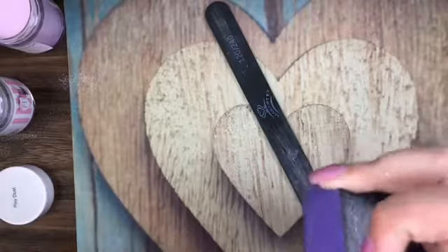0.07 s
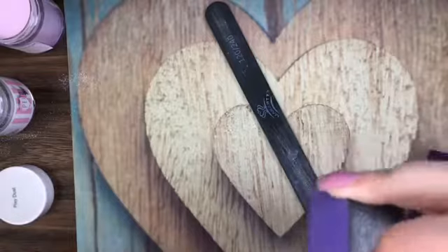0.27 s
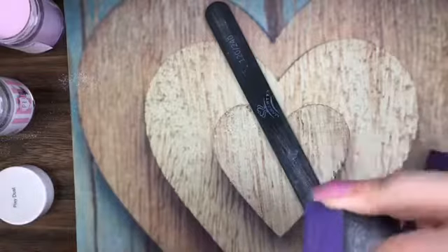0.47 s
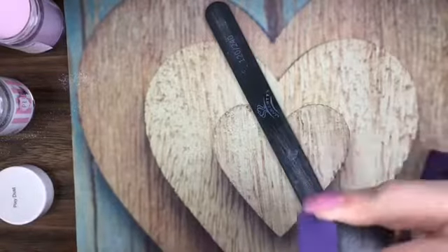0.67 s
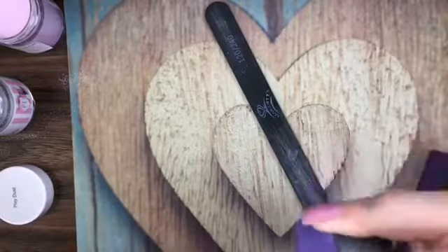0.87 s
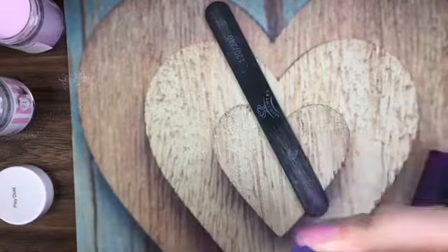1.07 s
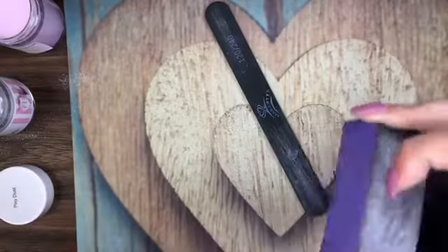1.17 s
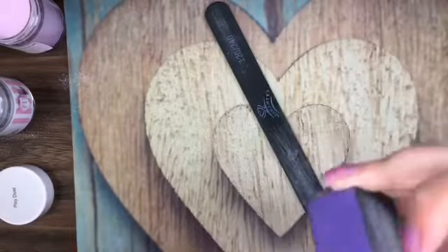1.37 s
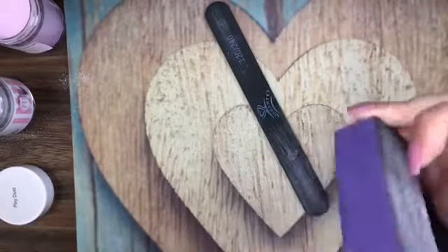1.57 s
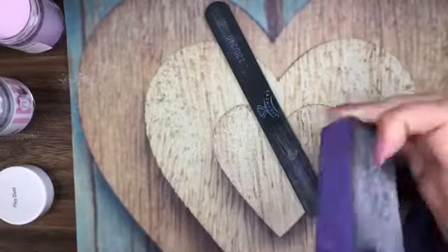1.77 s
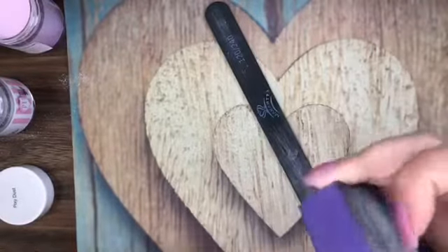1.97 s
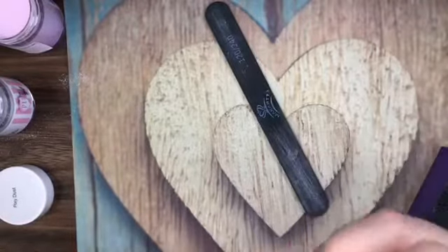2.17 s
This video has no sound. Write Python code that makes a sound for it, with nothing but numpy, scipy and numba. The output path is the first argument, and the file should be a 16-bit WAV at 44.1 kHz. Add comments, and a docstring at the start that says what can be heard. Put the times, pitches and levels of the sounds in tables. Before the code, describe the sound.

A gritty buffer block scrubs a fingernail from the start, about five back-and-forth cycles a second, each stroke a short dry scratch with a falling rasp. Near 1.05 s the last push digs in and snaps off the edge, the loudest moment. After a pause, soft knocks and ticks with short wipes come at 1.35 and 1.6 s, then a fainter wipe at 1.7 s. Quiet small room, close, centred, low hum.

```python
"""Foam buffer block on a fingernail

A block scrubs a nail about five times back and forth a second, then is set down with soft ticks for single wipes.
Dense grain impacts, coloured by nail and block, make the scratch; a resonance of falling pitch makes the rasp.
The last push digs in and flicks off the edge. Touch-downs are ringing ticks plus down-chirping knocks.
Close reflections, a small room's tail, dull air noise and a low hum surround it; both channels are equal."""
import sys
import numpy as np
from scipy import signal
from scipy.fft import rfft, irfft
from scipy.io import wavfile
from scipy.ndimage import uniform_filter1d, map_coordinates
from numba import njit

SR = 44100
rng = np.random.default_rng(int(sys.argv[2]) if len(sys.argv) > 2 else 0)


def put_to_file(sound):
    """Save the sound as 16-bit audio at rate SR, in the file named by the first command-line argument."""
    columns = np.atleast_2d(sound).T  # one column per channel
    safe = np.clip(columns, -1, 1)
    whole_steps = np.round(safe * 32767)
    wavfile.write(sys.argv[1], SR, whole_steps.astype(np.int16))


N = 97946

# forward strokes: start t/s, length/s, level/dB, attack/s, swell over the stroke/dB,
# rasp re scratch/dB, final rasp f/Hz
PUSH_STROKES = [(-.03, 0.053, -32.5, .008, -4, -5.5, 1880), (.166, 0.054, -37.5, 0.005, 0.5, -6.5, 1935),
                (0.352, 0.061, -36.5, .005, 2.5, -2.5, 2060), (0.5436, .057, -34, 0.0024, 0, -1.5, 1940),
                (0.729, 0.059, -34, 0.015, 0.5, -2.5, 2350), (0.907, 0.056, -36, 0.01, 3.5, -5, 2150),
                (1.005, 0.068, -38, 0.0041, 8, -17.5, 3000)]
# return strokes: same columns
PULL_STROKES = [(0.068, 0.069, -35.5, .016, -4, -1, 3200), (0.253, 0.085, -35.5, 0.016, -4.5, -4, 3500),
                (0.446, .068, -35.5, 0.0045, 3, -6.5, 3280), (0.631, 0.084, -34, .018, -4, -30, 3400),
                (0.822, 0.064, -36, .012, -1, 1, 3340)]
# scratch spectrum of pulls and grazes: f/Hz, level/dB
PULL_SPECTRUM = [(120, -51), (200, -18), (569, -9), (683, -15.5), (968, -10.5), (1350, -12.5), (1840, -16),
                 (2090, -3.5), (2750, -9.5), (3430, -0.5), (3830, -6.5), (7140, -6), (16000, -13.5)]
# resonances of nail and block: f/Hz, width/Hz, lift/dB
NAIL_RESONANCES = [(887, 52, 11.5), (2085, 53, 8.5), (2983, 33, 4), (3427, 130, 4), (5050, 900, 6)]

GRAINS_PER_S, GRAIN_SPREAD_DB = 17000, 2.5
LEVEL_WANDER_HZ, LEVEL_WANDER_DB = 170, 0.02  # too slight to hear
PULL_RELEASE_S = 0.0069


def undb(db):
    """Decibels to gain."""
    return 10 ** (np.asarray(db) / 20)


def unit(x):
    """Scale to an rms of 1."""
    return x / np.sqrt(np.mean(x ** 2))


def walk(rate_hz):
    """Smooth random wander with an rms of 1: noise averaged twice over 1/rate."""
    k = max(int(SR / rate_hz), 1)
    once = uniform_filter1d(rng.standard_normal(N), k)
    return unit(uniform_filter1d(once, k))


def colour(x, points, peaks=()):
    """Minimum-phase filter through (Hz, dB) points, with resonances on top."""
    size = 2 * N
    f = np.maximum(np.fft.rfftfreq(size, 1 / SR), 1)
    hz, db = np.array(points, float).T
    curve_db = np.interp(np.log(f), np.log(hz), db)
    for centre_hz, width_hz, lift_db in peaks:
        curve_db = curve_db + lift_db / (1 + (2 * (f - centre_hz) / width_hz) ** 2)
    # folding the cepstrum makes the response causal
    cepstrum = irfft(np.log(undb(curve_db)))
    cepstrum[1:N] *= 2
    cepstrum[N + 1:] = 0
    response = np.exp(rfft(cepstrum))
    return irfft(rfft(x, size) * response)[:N]


@njit
def resonate(x, hz, k):
    """State-variable band-pass with a moving centre and relative width k."""
    y, band, low = np.empty(len(x)), 0., 0.
    for i in range(len(x)):
        g = np.tan(np.pi * hz[i] / SR)
        v = (band + g * (x[i] - low)) / (1 + g * (g + k))
        band = 2 * v - band
        low = low + 2 * g * v
        y[i] = k * v
    return y


def grit():
    """Dense tiny impacts of abrasive grains, of random size and sign, in an even hiss."""
    hit = rng.random(N) < GRAINS_PER_S / SR
    size = undb(GRAIN_SPREAD_DB * np.minimum(rng.exponential(size=N), 5))
    sign = rng.choice([-1, 1], N)
    wander = undb(LEVEL_WANDER_DB * walk(LEVEL_WANDER_HZ))
    return unit(hit * size * sign * wander)


def resonant_grit(hz, width):
    """Grit through two equal band-passes of moving centre and relative width."""
    once = resonate(grit(), hz, float(width))
    return resonate(once, hz, float(width))


def scuff(hz, width):
    """Grit heard through one broad fixed resonance."""
    return unit(resonant_grit(np.full(N, float(hz)), width))


def contact(t, start, length, attack, release):
    """Pressure rises, holds and dies away."""
    rise = np.sin(np.pi / 2 * np.clip((t - start) / attack, 0, 1))
    return rise * np.exp(-np.maximum(t - start - length, 0) / release)


def background(t):
    """Dull room air and a wavering low hum."""
    # air spectrum: f/Hz, level/dB
    air_spectrum = [(15, -67), (25, -26), (49, -13.5), (92, -15.5), (123, -6), (229, -11.5), (263, -11.5),
                    (531, -24), (1130, -26), (1290, -30), (16000, -48.5)]
    # hum partials: f/Hz, level/dB
    hum_partials = [(58.6, -68), (122, -70)]
    air_db, waver_db = -62, 3
    hum = np.zeros(N)
    for hz, db in hum_partials:
        level = undb(db + waver_db * walk(6))
        hum += level * np.sqrt(2) * np.sin(2 * np.pi * (hz * t + rng.random()))
    return hum + undb(air_db) * unit(colour(rng.standard_normal(N), air_spectrum))


def nudges(t):
    """Soft low thuds of the table under the hand: decaying sines."""
    # hand nudging the table: t/s, level/dB
    thuds = [(1.058, -46.5), (1.084, -49.5), (1.345, -49), (1.646, -45)]
    thud_hz, decay_s = 72, 0.011
    out = np.zeros(N)
    for start, db in thuds:
        age = np.maximum(t - start, 0)
        out += undb(db) * np.exp(-age / decay_s) * np.sin(2 * np.pi * thud_hz * age)
    return out


def touches(t):
    """A bright tick, then a knock that spreads as a bending wave and so chirps downward."""
    # block touching down: t/s, knock peak/dB, knock brightness f/Hz, tick peak/dB
    touchdowns = [(1.3374, -32.5, 800, -45), (1.5665, -35, 1600, -32), (2.2042, -45.5, 445, -39.5)]
    # modes of the grit tick: f/Hz, t60/s, relative level/dB
    tick_modes = [(2970, 0.006, -8), (4010, 0.0066, 1.5), (5500, 0.0079, 0), (8400, 0.0034, -5)]
    bend_s, bend_ref_hz, low_hz = 0.00244, 1015, 400  # bend_s: travel time at bend_ref_hz
    f = np.fft.rfftfreq(N, 1 / SR)
    out = np.zeros(N)
    for start, knock_db, bright_hz, tick_db in touchdowns:
        low_cut = f ** 2 / (f ** 2 + low_hz ** 2)
        shape = low_cut / np.sqrt(1 + (f / bright_hz) ** 4) / np.sqrt(f + low_hz)
        # bending waves: delay falls as 1 / sqrt(f)
        cycles = f * start + 2 * bend_s * np.sqrt(f * bend_ref_hz)
        knock = irfft(shape * np.exp(-2j * np.pi * cycles), N)
        age = np.maximum(t - start, 0)
        tick = np.zeros(N)
        for hz, t60_s, mode_db in tick_modes:
            tick += undb(mode_db - 60 * age / t60_s) * np.sin(2 * np.pi * hz * age)
        out += undb(knock_db) * knock / np.abs(knock).max()
        out += undb(tick_db) * tick / np.abs(tick).max()
    return out


def grazes(t):
    """Faint scratching while the block barely touches."""
    # graze envelope: t/s, level/dB
    graze_levels = [(0, -65), (.07, -53), (.155, -71), (.25, -56), (.345, -55), (.535, -63.5), (.725, -53),
                    (.82, -58), (.9, -62), (1.002, -73), (1.082, -100), (1.334, -100), (1.339, -54),
                    (1.358, -55), (1.43, -68), (1.5, -78), (1.565, -100), (1.576, -51), (1.65, -53),
                    (1.675, -61), (1.76, -73.5), (1.93, -71), (2.05, -84), (2.22, -95)]
    when, db = np.array(graze_levels).T
    return undb(np.interp(t, when, db)) * unit(colour(grit(), PULL_SPECTRUM, NAIL_RESONANCES))


def fingertip(t):
    """The fingertip's dull scuff, strongest in mid-pull."""
    scuff_hz, relative_width, scuff_db = 1370, 0.37, -17  # dB re the pull
    gain = np.zeros(N)
    for start, length, db, *_ in PULL_STROKES:
        along = np.clip((t - start) / (length + PULL_RELEASE_S), 0, 1)
        gain += undb(db + scuff_db) * np.sin(np.pi * along)
    return gain * scuff(scuff_hz, relative_width)


def bites(t):
    """A short, low scuff as the finger gives when each push takes hold."""
    bite_hz, relative_width, release_s, bite_db = 926, 0.69, 0.003, -14  # dB re the push
    gain = np.zeros(N)
    for start, _, db, attack, *_ in PUSH_STROKES:
        gain += undb(db + bite_db) * contact(t, start, attack, attack, release_s)
    return gain * scuff(bite_hz, relative_width)


def strokes(t, rows, spectrum, release_s, top_hz):
    """Each stroke scratches broadly and rasps at a pitch that sinks as the block slows."""
    rasp_width, slowing = 0.24, 3.3  # relative bandwidth; exponent of the pitch fall
    rasp_middle = 0.23  # rasp gain in mid-stroke; the ends add 1
    rasp_settles = .9  # share of the stroke at which the pitch is lowest
    scratch_gain, rasp_gain = np.zeros(N), np.zeros(N)
    pitch = np.full(N, float(top_hz))
    for start, length, db, attack, swell_db, rasp_db, end_hz, arch_db in rows:
        along = np.clip((t - start) / length, 0, 1)
        ends = (2 * along - 1) ** 2
        pressure = contact(t, start, length, attack, release_s)
        gain = pressure * undb(db + swell_db * along - arch_db * ends)
        scratch_gain += gain
        rasp_gain += gain * undb(rasp_db) * (rasp_middle + ends) * pressure
        fall = np.minimum(along / rasp_settles, 1) ** slowing
        pitch = np.where(t >= start, top_hz + (end_hz - top_hz) * fall, pitch)
    scratch = unit(colour(grit(), spectrum, NAIL_RESONANCES))
    # bandwidth grows with pitch: even out the level
    rasp = unit(resonant_grit(pitch, rasp_width) / np.sqrt(pitch))
    return scratch_gain * scratch + rasp_gain * rasp


def wipes(t):
    """Single wipes after the block is set down."""
    # wipes: the pulls' columns, then mid-stroke arch over the ends/dB
    wipe_strokes = [(1.356, 0.067, -34.5, .011, -5.5, -10, 2600, 3),
                    (1.593, 0.043, -34.5, 0.0032, 0, -5, 2770, -2.5),
                    (1.689, 0.05, -45, .005, -8.5, -8.5, 2930, 3.5)]
    # scratch spectrum: f/Hz, level/dB
    wipe_spectrum = [(120, -38), (200, -9), (1320, -7.5), (1770, -8.5), (2020, -2.5), (2290, -13),
                     (2560, 4.5), (2800, -10.5), (3250, 1), (4520, -4), (7140, -6.5), (8580, -5.5),
                     (15100, -10), (16000, -22)]
    return strokes(t, wipe_strokes, wipe_spectrum, release_s=0.0052, top_hz=3980)


def flick(t):
    """The last push digs in, catches on the nail's edge and slips off: scrape plus filtered clicks."""
    # scrape envelope: t/s, level/dB
    scrape_levels = [(1.021, -51), (1.042, -32.5), (1.06, -26.5), (1.067, -22.5), (1.073, -27),
                     (1.079, -36), (1.087, -40.5), (1.099, -56.5)]
    # grit catching on the edge: t/s, click level/dB
    edge_snaps = [(1.0655, -17), (1.0705, -26.5), (1.0749, -11)]
    # flick spectrum: f/Hz, level/dB
    flick_spectrum = [(120, -20), (260, -12), (450, -13.5), (680, -19), (920, -9.5), (1300, -4.5),
                      (1800, -10.5), (2870, -2), (3900, -6), (4780, -3), (7350, -6.5), (10000, -16),
                      (16000, -23.5)]
    when, db = np.array(scrape_levels).T
    gain = undb(np.interp(t, when, db)) * (t > when[0]) * (t < when[-1])
    scrape = gain * unit(colour(grit(), flick_spectrum, NAIL_RESONANCES))
    catches = np.zeros(N)
    for start, peak_db in edge_snaps:
        catches[int(start * SR)] = undb(peak_db)
    snaps = colour(catches, flick_spectrum, NAIL_RESONANCES)
    return scrape + snaps * catches.max() / np.abs(snaps).max()


def pulls(t):
    """Return strokes, arched towards mid-stroke."""
    arch_db = 8  # mid-stroke over the ends
    rows = [(*row, arch_db) for row in PULL_STROKES]
    return strokes(t, rows, PULL_SPECTRUM, PULL_RELEASE_S, top_hz=4640)


def pushes(t):
    """Forward strokes with a nearly flat arch."""
    # scratch spectrum: f/Hz, level/dB
    push_spectrum = [(120, -39.5), (200, -16), (933, -11), (1320, -24.5), (2020, -1.5), (2700, -11),
                     (3020, -1), (3250, 0), (4680, -5.5), (5230, -5.5), (12400, -8), (14300, -10.5),
                     (16000, -17.5)]
    arch_db = 0.5  # mid-stroke over the ends
    rows = [(*row, arch_db) for row in PUSH_STROKES]
    return strokes(t, rows, push_spectrum, release_s=0.009, top_hz=4510)


def patchy(x, count=26):
    """The contact patch shifts: overlapping bands wander in level, each on its own."""
    patch_db, patch_hz = 2.0, 42
    f = np.maximum(np.fft.rfftfreq(N, 1 / SR), 1)
    place = np.interp(np.log(f), np.log([600, 16000]), [0, count - 1])
    spectrum = rfft(x)
    out = np.zeros(N)
    for k in range(count):
        band = irfft(spectrum * np.maximum(1 - np.abs(place - k), 0), N)
        out += band * undb(patch_db * walk(patch_hz))
    return out


def bounces(x, t):
    """Close reflections comb the scratching; the pattern shifts as the hand moves."""
    # reflections from fingers, block and table: delay/s, level/dB
    reflections = [(.0007, -11), (.0017, -22.5), (.0029, -17.5), (.0046, -25)]
    sway_s, sway_hz = .00004, 3.5
    out = x.copy()
    for delay_s, db in reflections:
        source_t = t - delay_s - sway_s * walk(sway_hz)
        out += undb(db) * map_coordinates(x, [source_t * SR], order=3)
    return out / np.sqrt(1 + sum(undb(db) ** 2 for _, db in reflections))


def room(x):
    """A short noise tail whose treble dies first."""
    t60_s, treble_t60_s, room_db, gap_s, split_hz = 0.25, 0.11, -19, .005, 6000
    t = np.arange(SR // 2) / SR
    noise = rng.standard_normal(len(t))
    low = signal.sosfilt(signal.butter(2, split_hz, fs=SR, output="sos"), noise)
    high = signal.sosfilt(signal.butter(2, split_hz, "high", fs=SR, output="sos"), noise)
    tail = low * undb(-60 * t / t60_s) - .5 * high * undb(-60 * t / treble_t60_s)
    tail = tail * (t > gap_s)
    tail = tail / np.sqrt(np.sum(tail ** 2))
    return x + undb(room_db) * signal.fftconvolve(x, tail)[:N]


def scene():
    """All the buffing in the room, the same in both channels."""
    t = np.arange(N) / SR
    rubbing = pushes(t) + bites(t) + pulls(t) + fingertip(t) + wipes(t) + flick(t) + grazes(t)
    scratching = bounces(patchy(rubbing), t)
    mono = room(scratching + touches(t) + nudges(t)) + background(t)
    return np.array([mono, mono])


def record(dry):
    """The recorder cuts the top with a steep elliptic low-pass."""
    top_hz = 16150
    return signal.sosfilt(signal.ellip(10, .2, 70, top_hz, fs=SR, output="sos"), dry)


dry = scene()
out = record(dry)
put_to_file(out)
```